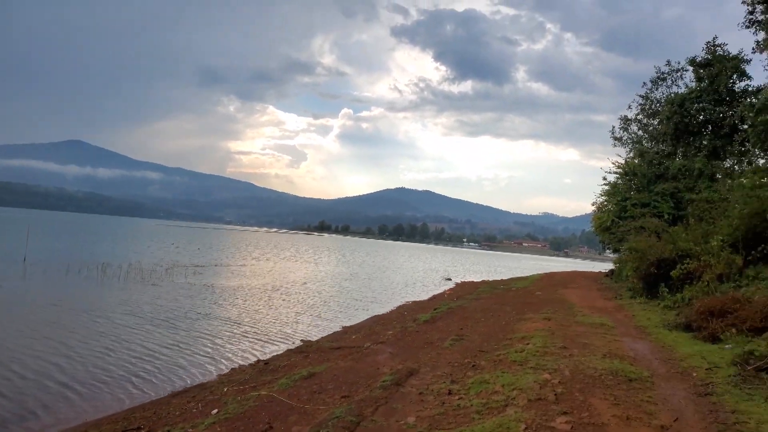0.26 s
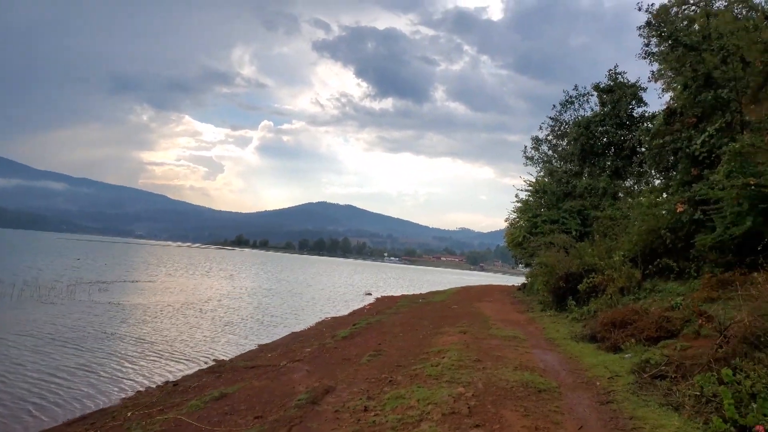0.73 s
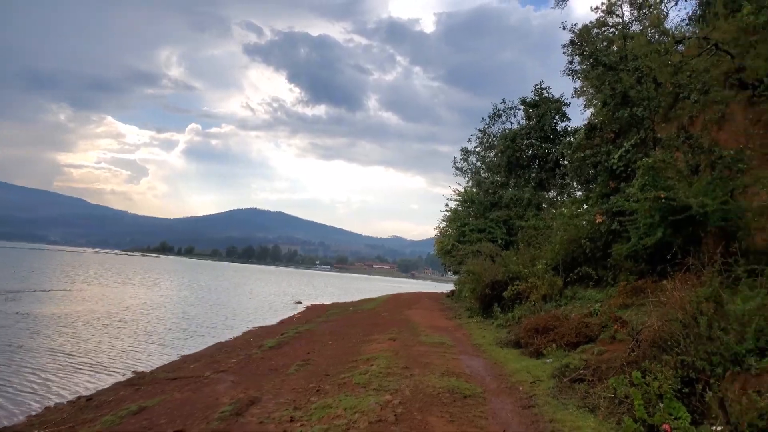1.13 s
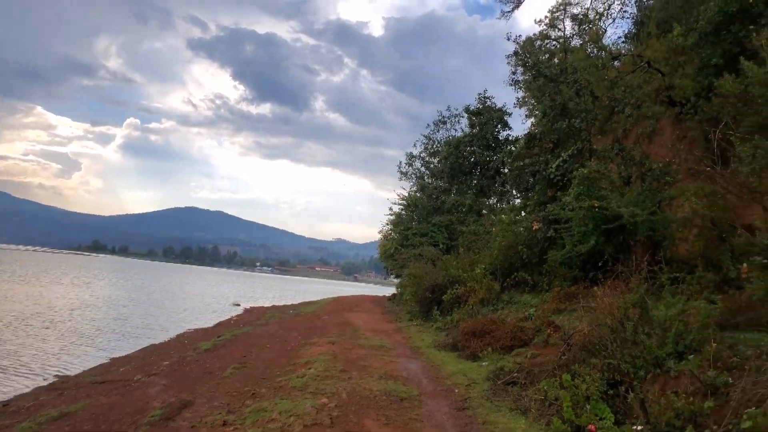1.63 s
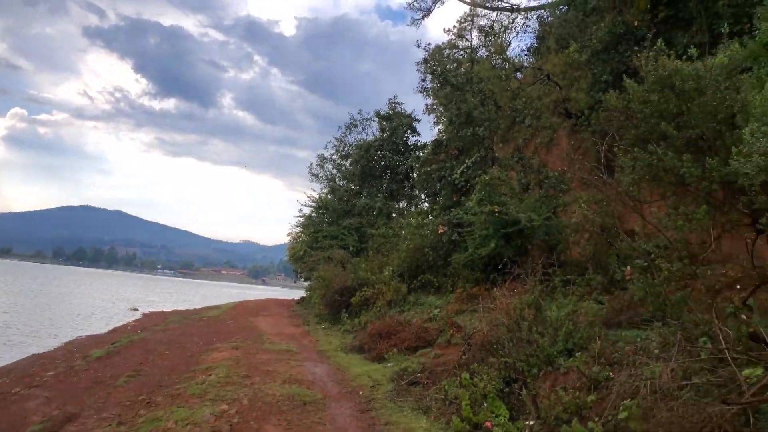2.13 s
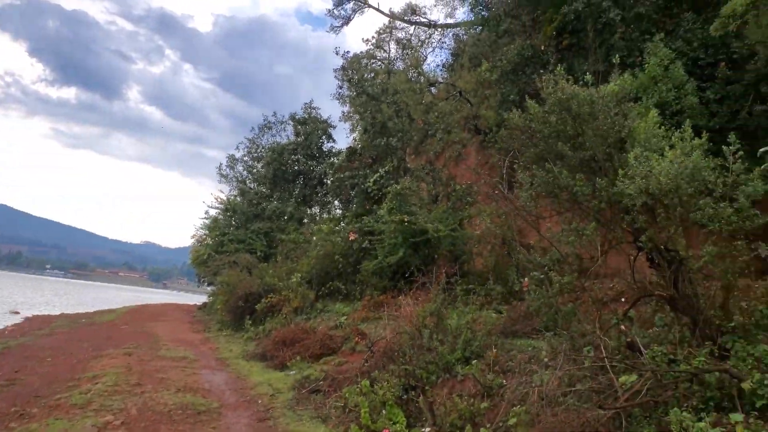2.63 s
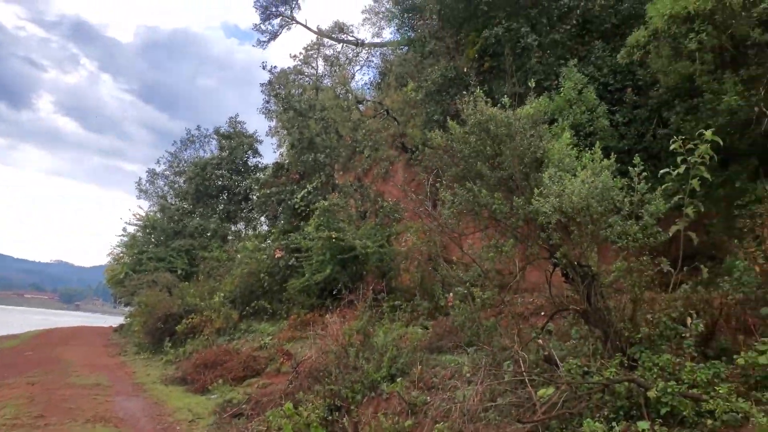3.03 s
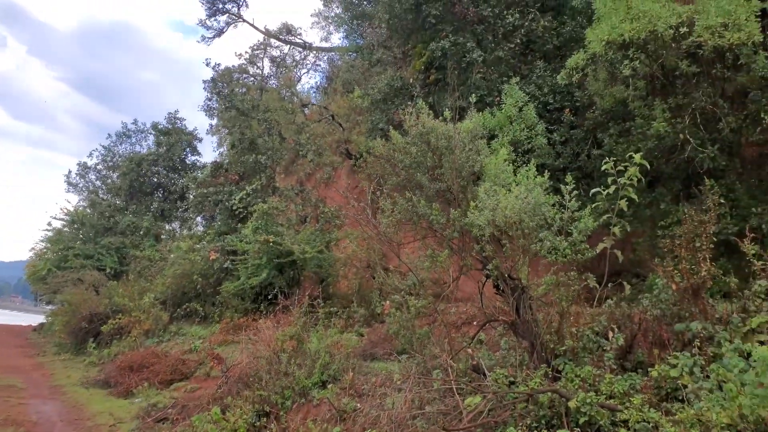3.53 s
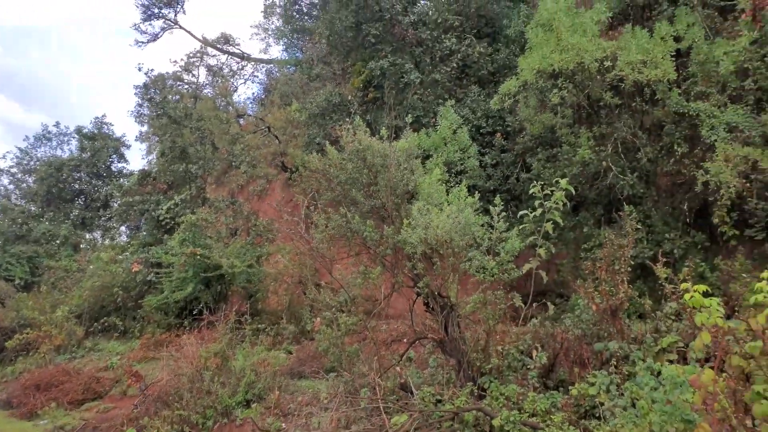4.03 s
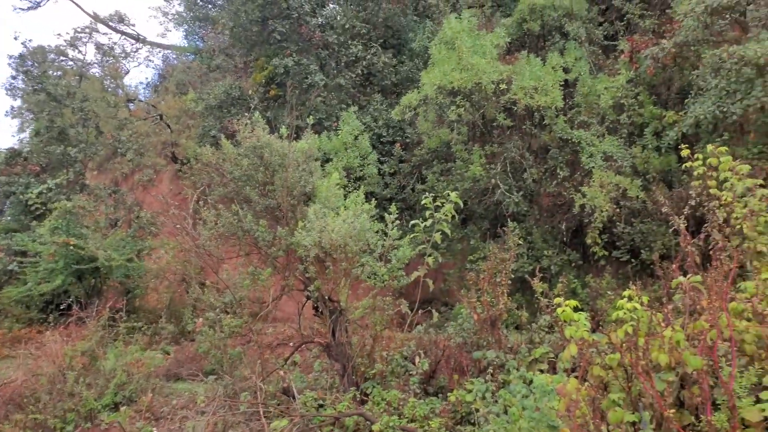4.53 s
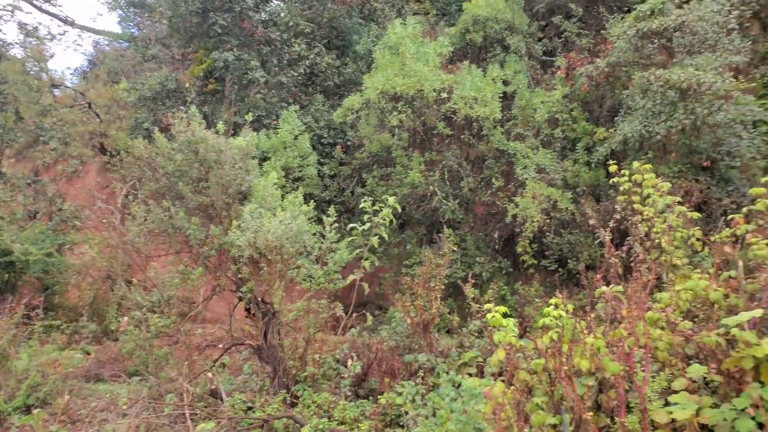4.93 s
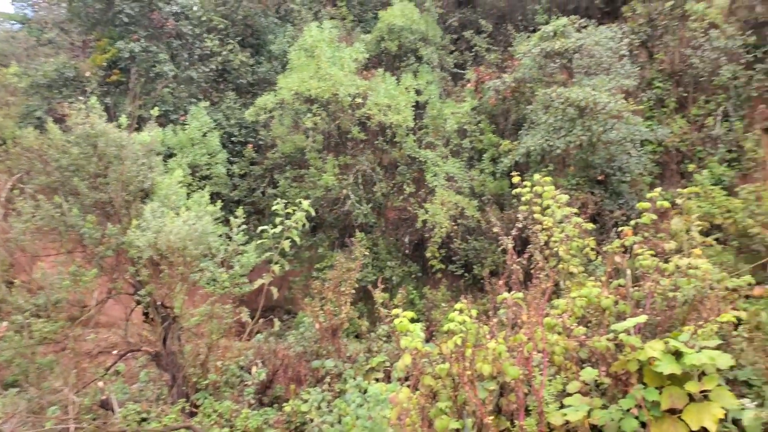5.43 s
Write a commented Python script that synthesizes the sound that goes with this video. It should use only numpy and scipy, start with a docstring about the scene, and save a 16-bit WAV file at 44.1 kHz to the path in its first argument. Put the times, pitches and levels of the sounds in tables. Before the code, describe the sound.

A quiet lakeshore by a wooded bank, heard on a handheld stereo microphone. Low wind rumble runs throughout; short muffled gusts bump the microphone at about 0.3, 0.7 and 1.3-1.4 seconds, then weaker ones near 2.1, 2.7, 3.1 and 4.5. A far motor hums low, strongest around 1.6 seconds, fading, then returning faintly from 4 to 4.8. High and thin, crickets trill in fast pulses over a continuous chorus, with a flickering insect hiss above; the bank's insects thicken until about 2.6. Soft bird whistles bend at 1.5-1.9, 2.2-2.6, most clearly at 2.9, again at 3.5-3.8, with tiny higher notes around 5. Faint dry ticks are scattered about. Small wavelets plop at 1.8, then in clusters at 3.8-4.2, 5.0 and 5.3-5.5, with barely audible washes. One sharp close snap cracks at 5.2 seconds, scattering briefly off the trees. Everything stops abruptly near 5.7.

```python
"""Light wind rumbles on the microphone at a lake shore under a wooded bank: noise swelling with the gusts.
Something snaps once close by among faint ticks, as filtered pulses; a far motor hums in gliding sines.
Small wavelets plop as decaying sines and wash up in soft noise; birds whistle bent tones in the trees.
Three crickets trill in tone strokes over a noise chorus of others, and bush crickets hiss above them."""
import sys
import numpy as np
from scipy import signal
from scipy.fft import rfft, irfft, next_fast_len
from scipy.io import wavfile
from scipy.ndimage import map_coordinates

SR = 44100
rng = np.random.default_rng(int(sys.argv[2]) if len(sys.argv) > 2 else 0)


def pcm_store(signal):
    """Save signal as 16-bit PCM."""
    levels = np.round(np.clip(np.atleast_2d(signal), -1, 1) * 32767)
    wavfile.write(sys.argv[1], SR, levels.astype(np.int16).T)


N = 250047


def amp(db):
    """Decibels to gain."""
    return 10 ** (np.asarray(db) / 20)


def unit(x):
    """Scaled to rms 1."""
    return x / np.sqrt(np.mean(x ** 2) + 1e-20)


def curves(rows):
    """One value per sample for each column after the time."""
    s, *cols = np.transpose(rows)
    return [np.interp(np.arange(N) / SR, s, c) for c in cols]


def wobble(rate):
    """A smooth random curve, rate knots a second."""
    knots = rng.standard_normal(int(N * rate / SR) + 4)
    return map_coordinates(knots, [np.arange(N) * rate / SR])


def swells(rows):
    """Gain of overlapping bells (centre s, peak dB, length s); a length is the time within 3 dB of the peak."""
    t = np.arange(N) / SR
    power = sum(amp(db) ** 2 * .5 ** ((2 * (t - s) / length) ** 2) for s, db, length in rows)
    return np.sqrt(power)


def filtered(x, response):
    """x times a response of frequency."""
    m = next_fast_len(N + SR // 2)
    return irfft(rfft(x, m) * response(np.fft.rfftfreq(m, 1 / SR)), m)[..., :N]


def coloured(x, points):
    """x through a spectrum of (Hz, dB) points on a log axis."""
    f, db = np.transpose(points)

    def response(hz):
        return amp(np.interp(np.log(hz + 1), np.log(f), db, left=-120, right=-120))

    return filtered(x, response)


def rush(spectrum, side_db):
    """Stereo noise of rms 1; side_db sets its width."""
    mid, side = coloured(rng.standard_normal((2, N)), spectrum)
    return unit(np.array([mid + amp(side_db) * side, mid - amp(side_db) * side]))


def placed(x, pan_db, wet_db, t60):
    """A source leaning left by pan_db, with its scatter from the trees."""
    t = np.arange(SR // 2) / SR
    tail = rng.standard_normal((2, len(t))) * amp(-60 * t / t60) * (1 - np.exp(-t / 0.0035))
    echo = signal.fftconvolve(x[None], tail / np.linalg.norm(tail[0]), axes=1)[:, :N]
    return (x + amp(wet_db) * echo) * amp([[pan_db / 2], [-pan_db / 2]])


def late(x, delay_s):
    """x delayed; its end wraps to the start."""
    return np.roll(x, round(delay_s * SR))


def clicks(rows, colour, rattle_db, t60, size=2048):
    """Each row's sharp pulse, peaking at its level, and brief rattle ring out with the given spectrum."""
    out, t = np.zeros(N), np.arange(SR // 20) / SR
    for s, db in rows:
        rattle = amp(rattle_db) * rng.standard_normal(len(t)) * amp(-60 * t / t60)
        out[round(s * SR):][:len(t)] += amp(db) * ((t == 0) + rattle)
    f, db = np.transpose(colour)
    hz = np.fft.rfftfreq(size, 1 / SR)
    log_gain = np.log(amp(np.interp(np.log(hz + 1), np.log(f), db)))
    # minimum phase: fold the cepstrum onto positive lags
    lag = np.arange(size)
    fold = np.where(lag == 0, 1, 2 * (lag < size // 2))
    ring = irfft(np.exp(rfft(irfft(log_gain) * fold)))
    return signal.fftconvolve(out, ring / np.abs(ring).max())[:N]


def wind():
    """Eddies buffet each port separately, over a broad rumble and the far air."""
    # Gusts on the microphone. Each row: centre in seconds, peak in dB, length in seconds.
    gusts = [(.26, -30.5, 0.029), (.73, -28, 0.039), (1.255, -27.5, 0.018), (1.28, -35, 0.32),
             (1.435, -31, 0.04), (2.1, -42, 0.14), (2.69, -46, 0.09), (3.09, -43, 0.14), (4.54, -43, 0.066)]
    # Rumble course. Each row: time in seconds, level in dB.
    rumble_course = [(0, -47.5), (1.5, -45), (2.4, -46), (4.5, -47.5), (5.67, -48)]
    # Spectra of eddies, rumble and far air. Each row: frequency in Hz, relative level in dB per Hz.
    eddy_spectrum = [(18, -33), (28, -14.5), (42, 5), (60, -0.5), (90, -0.5), (120, -11), (180, -19),
                     (300, -40)]
    rumble_spectrum = [(45, -13.5), (68, -11), (90, 3), (110, -2.5), (140, -1.5), (180, -1), (215, -13),
                       (310, -15), (450, -27), (600, -46.5), (900, -51.5), (1300, -70.5)]
    air_spectrum = [(200, -4), (500, 9.5), (750, -0.5), (1000, -7), (1500, -9), (2100, -8.5), (3000, -14),
                    (4500, -13), (7000, -19.5), (8800, -29), (15000, -7.5)]
    breeze_db, breeze_swing_db = -57, 7  # buffeting between gusts
    air_start_db, air_rise_db_per_s = -73.5, 0.31

    t = np.arange(N) / SR
    eddies = rush(eddy_spectrum, side_db=0)
    breeze = amp(breeze_db + breeze_swing_db * wobble(9))
    force = np.hypot(breeze, swells(gusts))
    rumble = amp(curves(rumble_course)[0]) * rush(rumble_spectrum, side_db=-11.0)
    rumble = rumble * amp([[-.9], [.9]])  # leans right
    air_db = air_start_db + air_rise_db_per_s * t + 1.3 * wobble(6.1)
    air = amp(air_db) * rush(air_spectrum, side_db=1)
    return force * eddies + rumble + air


def snap():
    """One sharp snap from the left; the bank scatters it and the ground returns its treble."""
    # Snap spectrum. Each row: frequency in Hz, relative level in dB.
    snap_spectrum = [(200, -11.5), (420, 13), (720, 3), (950, -1), (1220, 3.5), (1650, -14.5), (1980, -6),
                     (2500, -5), (3200, -21.5), (4000, -2), (4800, -9), (5600, 1.5), (6700, -4.5),
                     (7500, -9.5), (11000, -12), (13200, 4), (15400, 5.5), (16600, -7.5)]
    snap_s, snap_db, scatter_db = 5.2248, -23, -11.5
    lag_s, shade = .00036, 0.17  # the right port hears treble later and loses this share of it
    bounce_s, bounce_db = .0095, -15

    crack = clicks([(snap_s, snap_db)], snap_spectrum, rattle_db=-25, t60=.01)
    treble = filtered(crack, lambda hz: hz ** 2 / (hz ** 2 + 3500 ** 2))
    right = crack - treble + (1 - shade) * late(treble, lag_s)
    direct = np.array([crack, right])
    bounce = placed(late(treble, bounce_s), pan_db=3, wet_db=-8, t60=.3)
    scatter = placed(crack, pan_db=0, wet_db=0, t60=.2) - crack
    return direct + amp(bounce_db) * bounce + amp(scatter_db) * scatter


def ticks():
    """Faint knocking pulses, each ringing through one spectrum scaled to its pitch."""
    # Ticks. Each row: start in seconds, pulse peak in dB, pitch in Hz.
    tick_rows = [(.97, -57.5, 2250), (1.09, -64, 2000), (2.043, -58, 2100), (2.862, -57, 1800),
                 (2.942, -56.5, 1800), (3.165, -63.5, 1600), (4.195, -64.5, 1900), (4.337, -63, 2200),
                 (4.569, -62, 1900), (4.596, -56, 2200), (4.935, -66, 1900)]
    # Tick spectrum. Each row: multiple of the pitch, relative level in dB.
    tick_spectrum = [(.2, -7), (.45, -2.5), (.7, 0), (.88, 3.5), (1.08, 6), (1.3, -7.5), (2.2, -11.5),
                     (3.5, -26.5), (7, -34)]

    knocks = np.zeros(N)
    for s, db, hz in tick_rows:
        scaled = [(k * hz, level) for k, level in tick_spectrum]
        knocks += clicks([(s, db)], scaled, rattle_db=-26.5, t60=0.052)
    return placed(knocks, pan_db=1.5, wet_db=-2.5, t60=0.081)


def motor():
    """A far hum that drifts in and out and slowly gathers speed, with its half order and a thin whine."""
    # Hum swells. Each row: centre in seconds, peak in dB, length in seconds.
    hum_swells = [(1.6, -42.5, 1.57), (4.05, -46, 0.24), (4.6, -45.5, 0.71)]
    # Whine course. Each row: time in seconds, peak level in dB.
    whine_course = [(0, -85), (2, -82), (3.5, -76), (5.67, -77.5)]
    start_hz, rise_hz_per_s = 133.43, 1.8

    hz = start_hz + rise_hz_per_s * np.arange(N) / SR
    phase = 2 * np.pi * np.cumsum(hz * (1 + .004 * wobble(8))) / SR
    hum = np.sin(phase) + amp(-25.0) * np.sin(2 * phase)
    half_order = amp(-50.0 + 4.9 * wobble(7)) * np.sin(phase / 2)
    whine_hz = 531 + 4 * wobble(14)
    whine_gain = amp(curves(whine_course)[0] + 1.8 * wobble(2.99))
    whine = whine_gain * np.sin(2 * np.pi * np.cumsum(whine_hz) / SR)
    return swells(hum_swells) * amp(.7 * wobble(11.0)) * hum + half_order + whine


def wavelets():
    """Water washes softly up the shore; each plop is a slap and a pocket of air that rings a few cycles."""
    # Plops. Each row: start in seconds, peak in dB.
    plop_rows = [(1.811, -54), (1.96, -64), (3.825, -58.5), (3.887, -58.5), (3.983, -56), (4.098, -60),
                 (4.195, -52.5), (4.233, -51.5), (4.569, -58.5), (4.927, -62.5), (4.962, -54.5),
                 (5.002, -56), (5.346, -60), (5.39, -60), (5.5, -59), (5.546, -59)]
    # Washes up the shore. Each row: centre in seconds, peak in dB, length in seconds.
    washes = [(1.81, -76, 0.14), (2.55, -76, 0.14), (4.55, -78.5, 0.12)]
    # Spectra of slap and wash. Each row: frequency in Hz, relative level in dB per Hz.
    slap_spectrum = [(500, -5.5), (1100, -8), (1600, 0.5), (2400, -20.5), (4500, -22), (9000, -39.5)]
    wash_spectrum = [(400, -9), (750, 3.5), (1100, -14.5), (2200, -18), (5000, -36.5)]
    pocket_hz, pocket_spread = 641, 0.077  # mean pitch, scatter as a share of it
    slap_db = -9  # relative to the plop

    water = np.zeros(N)
    t = np.arange(SR // 20) / SR
    ring = amp(-60 * t / 0.015) * (1 - np.exp(-t / 0.0018))
    for s, db in plop_rows:
        hz = pocket_hz * (1 + pocket_spread * rng.standard_normal())
        water[round(s * SR):][:len(t)] += amp(db) * ring / ring.max() * np.sin(2 * np.pi * hz * t)
    slaps = [(s, db + slap_db) for s, db in plop_rows]  # each slap traps a pocket
    water += clicks(slaps, slap_spectrum, rattle_db=-24, t60=.01)
    plops = placed(water, pan_db=0, wet_db=-14, t60=.1)
    return plops + swells(washes) * rush(wash_spectrum, side_db=-5.5)


def birds():
    """Whistles among the trees: each note bends, swells and fades; some are hoarse, and long ones warble."""
    # Notes. Each row: start in seconds, length in seconds, first, middle and last pitch in Hz,
    # peak in dB, place of the peak (0-1), hoarseness as a share of the pitch.
    notes = [ (1.49, 0.07, 3600, 3760, 3790, -81.5, .45, 0.0061),
             (1.578, 0.055, 2060, 1990, 2040, -70, 0.85, 0.022),
             (1.634, 0.035, 2000, 1910, 1920, -62, 0.79, 0.023),
             (1.763, 0.072, 2640, 2743, 2645, -68, 0.77, 0.024),
             (1.82, 0.052, 2610, 2450, 2480, -73.5, 0.52, 0.022),
             (1.848, 0.022, 2980, 2750, 2560, -70.5, 0.5, 0.022),
             (2.198, 0.087, 1700, 2035, 2170, -73, 0.3, 0.017),
             (2.298, 0.075, 2315, 1934, 1775, -68, .46, 0.035),
             (2.365, .15, 1640, 1527, 1553, -77, 0.67, .005),
             (2.58, 0.1, 2125, 2114, 2250, -76.5, 0.6, 0.011),
             (2.824, 0.068, 2220, 2287, 2265, -65.5, 0.34, 0.007),
             (2.889, .072, 2210, 2020, 1985, -55, 0.74, 0.012),
             (2.953, 0.031, 1990, 2004, 2100, -65, 0.23, 0.01),
             (2.984, 0.13, 2390, 2445, 2400, -68, 0.54, 0.011),
             (3.512, 0.08, 2340, 2280, 2220, -69.5, 0.47, 0.014),
             (3.545, 0.051, 2197, 1964, 2080, -61.5, 0.44, 0.018),
             (3.588, 0.17, 2043, 1967, 1914, -64, 0.19, 0.0077),
             (3.752, .064, 2000, 1930, 1940, -74.5, 0.58, 0.005),
             (3.63, 0.19, 2380, 2320, 2310, -83, 0.28, .007),
             (4.901, 0.048, 2980, 3140, 3370, -77, .5, .011),
             (4.984, 0.14, 3780, 4050, 4050, -76.5, .24, 0.01),
             (5.195, 0.056, 4330, 4220, 4170, -77, 0.61, 0.014),
             (5.283, .04, 4300, 4230, 4180, -82, .45, .014),
             (5.388, 0.032, 4300, 4210, 4200, -85, .45, .014),
             (5.478, .035, 4260, 4180, 4160, -88, .45, .014),
             (5.61, 0.034, 2300, 2300, 2430, -75.5, 0.98, .007)]
    note_fade_db = 10  # fall from the peak to either end, before the soft edges
    edge_s = 0.0039
    warble_hz, warble_share, warble_min_s = 12, .016, .14  # only notes longer than this warble
    bank_echo_s, bank_echo_db = .27, -32.5  # the bank answers

    song = np.zeros(N)
    t = np.arange(N) / SR
    flutter, tremble_db = wobble(300), 2.0 * wobble(110)
    for s, length, first_hz, middle_hz, last_hz, db, crest, hoarse in notes:
        on = (t > s) & (t < s + length)
        age = t[on] - s
        warble = warble_share * (length > warble_min_s) * np.cos(2 * np.pi * warble_hz * age)
        bend_hz = np.interp(age / length, [0, .5, 1], [first_hz, middle_hz, last_hz])
        pitch_hz = bend_hz * (1 + warble + hoarse * flutter[on])
        fade_db = note_fade_db * np.interp(age / length, [0, np.clip(crest, 0, 1), 1], [1, 0, 1])
        edges = np.minimum(1, np.minimum(age, length - age) / edge_s)
        gain = edges * amp(db - fade_db + tremble_db[on])
        song[on] += gain * np.sin(2 * np.pi * np.cumsum(pitch_hz) / SR)
    near = placed(song, pan_db=4, wet_db=-4.5, t60=.2)
    far = placed(late(song, bank_echo_s), pan_db=0, wet_db=6, t60=.6)
    return near + amp(bank_echo_db) * far


def trill(rate, top_hz, sweep_hz, duty):
    """Each uneven wing stroke is a short tone that climbs to the wing's resonance and rests there."""
    strokes = rng.random() + np.cumsum(rate * (1 + .008 * wobble(6))) / SR + .01 * wobble(40)
    u = np.minimum(strokes % 1 / duty, 1)  # progress of the stroke
    jitter_hz = (20 + 130 * (1 - u) ** 2) * wobble(400)
    hz = top_hz - sweep_hz * (1 - u) ** 4 + jitter_hz
    force = amp(1.2 * wobble(30) + 1.5 * wobble(350))
    return unit(np.sin(np.pi * u) * force * np.sin(2 * np.pi * np.cumsum(hz) / SR))


def cricket_trills():
    """Near, middle and low crickets trill in stroke trains; the low one sits in noise from the bank."""
    # Near cricket's swells. Each row: centre in seconds, peak in dB, length in seconds.
    near_swells = [(.12, -70.5, 0.55), (.5, -73, 0.44), (1.4, -68.5, 0.44), (2.7, -76, 0.7),
                   (3.7, -75, 0.62), (4.7, -70, 0.35), (5.5, -72, 0.39)]
    # Middle cricket's course. Each row: time in seconds, level in dB.
    middle_course = [(0, -84.5), (2.1, -78.5), (2.9, -73.5), (4.8, -75), (5.2, -82)]
    # Bank noise. Each row: frequency in Hz, relative level in dB per Hz.
    bank_spectrum = [(5300, -28), (5560, 1.5), (5800, -6), (6100, -0.5), (6400, -19)]
    # the bank grows until the microphone faces it
    bank_db, bank_faced_s, bank_turn_db_per_s = -81, 2.6, 7.5

    t = np.arange(N) / SR
    near = trill(rate=34.3, top_hz=6910, sweep_hz=650, duty=.68)
    middle = trill(rate=31.7, top_hz=6360, sweep_hz=350, duty=.52)
    low = trill(rate=33, top_hz=5760, sweep_hz=300, duty=.4)
    near = placed(swells(near_swells) * near, pan_db=-3, wet_db=-8, t60=.1)
    middle = placed(amp(curves(middle_course)[0]) * middle, pan_db=-5, wet_db=-8, t60=.12)
    low = placed(amp(-6) * low, pan_db=-11.5, wet_db=-3, t60=0.15)
    bank_noise = rush(bank_spectrum, side_db=1.0) * amp([[-3], [3]])  # leans right
    bank_gain = amp(bank_db - bank_turn_db_per_s * np.maximum(0, bank_faced_s - t))
    return near + middle + bank_gain * (low + bank_noise)


def cricket_chorus():
    """Many crickets blur into a band of noise that never pauses; more voices join for a while."""
    # Joining voices. Each row: centre in seconds, peak in dB, length in seconds.
    joining = [(.74, -72.5, .3), (2.0, -77.5, 0.37), (2.9, -78.5, .35), (4.55, -71, 0.25)]
    # Chorus band. Each row: frequency in Hz, relative level in dB per Hz.
    chorus_spectrum = [(5200, -40.5), (5600, -27.5), (6000, -9), (6250, 2.5), (6850, 2), (7020, -12),
                       (7200, -13.5), (8000, -38.5)]
    start_db, rise_db_per_s = -69, 0.16

    t = np.arange(N) / SR
    voices = np.hypot(amp(start_db + rise_db_per_s * t), swells(joining))
    return voices * rush(chorus_spectrum, side_db=2.5) * amp([[-1.3], [1.3]])  # leans right


def bush_crickets():
    """A flickering hiss of high noise, far above the trills in pitch."""
    # Hiss course. Each row: time in seconds, level in dB.
    hiss_course = [(0, -76.5), (2.6, -74.5), (3.8, -80.5), (4.4, -80), (5.2, -77.5)]
    # Hiss band. Each row: frequency in Hz, relative level in dB per Hz.
    hiss_spectrum = [(8500, -45), (10500, -15.5), (12500, -8.5), (13800, 2), (14600, -2), (15700, -4.5)]
    pan_db = 2.5  # left over right

    gain = amp(curves(hiss_course)[0] + 2.6 * wobble(45))
    return gain * rush(hiss_spectrum, side_db=-1.0) * amp([[pan_db / 2], [-pan_db / 2]])


def scene():
    """Everything heard from the shore."""
    shore = wind() + snap() + ticks() + motor() + wavelets() + birds()
    return shore + cricket_trills() + cricket_chorus() + bush_crickets()


def record(dry):
    """The recorder cuts the deepest rumble and keeps nothing above its band limit."""
    low_cut_hz, top_hz = 36.0, 16600

    def response(hz):
        low_cut = hz ** 3 / np.sqrt(hz ** 6 + low_cut_hz ** 6)
        return low_cut * (hz < top_hz)

    return filtered(dry, response)


dry = scene()
out = record(dry)
pcm_store(out)
```